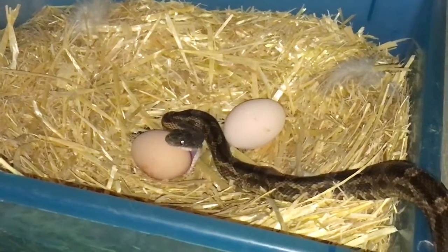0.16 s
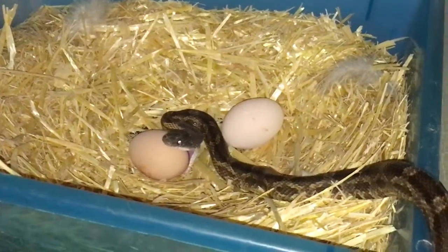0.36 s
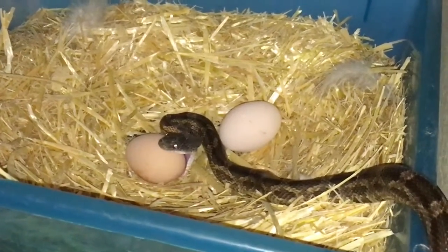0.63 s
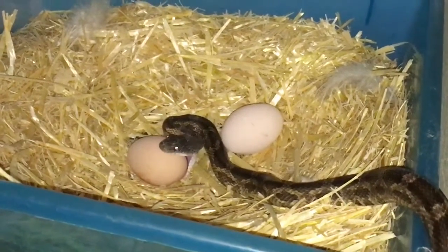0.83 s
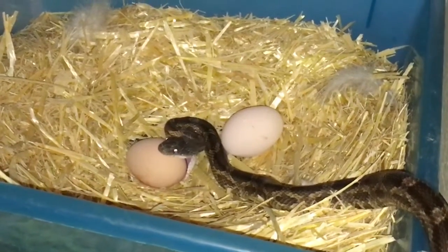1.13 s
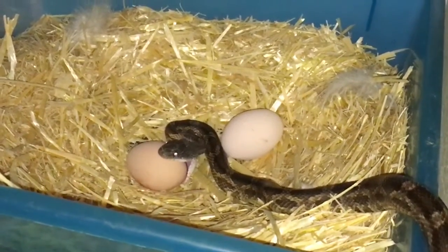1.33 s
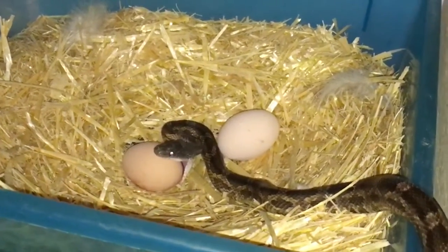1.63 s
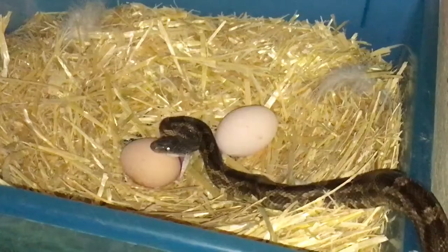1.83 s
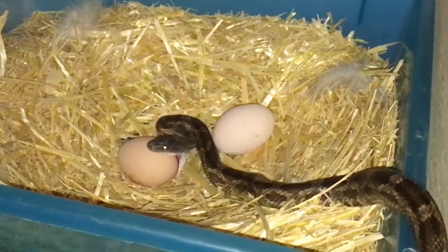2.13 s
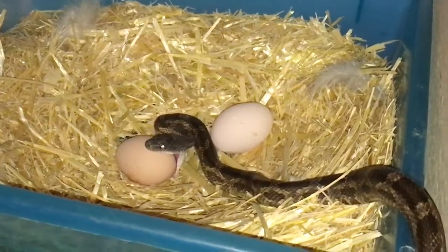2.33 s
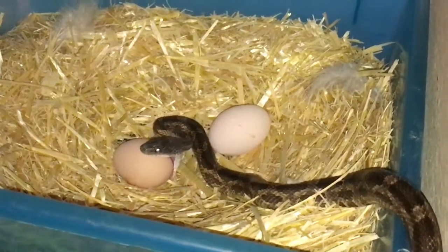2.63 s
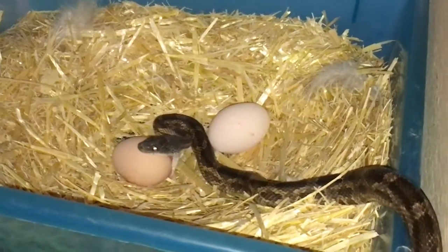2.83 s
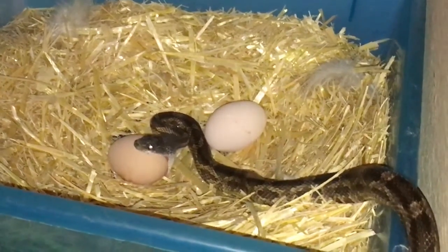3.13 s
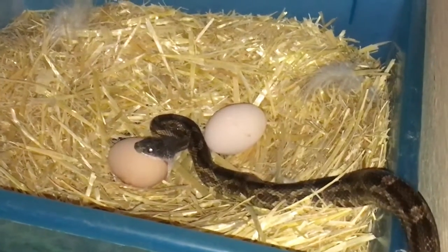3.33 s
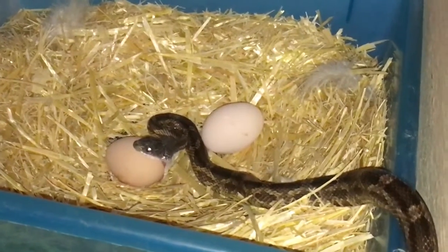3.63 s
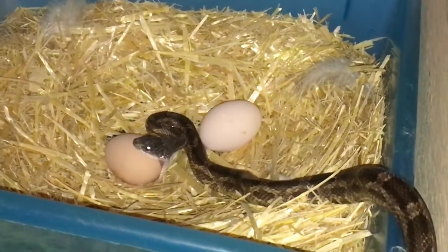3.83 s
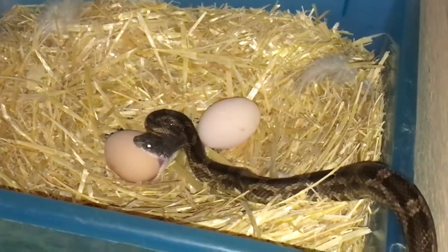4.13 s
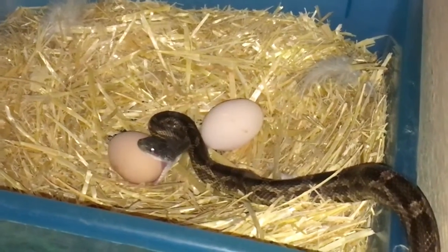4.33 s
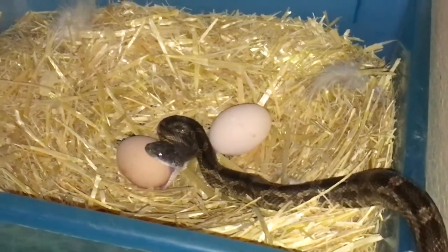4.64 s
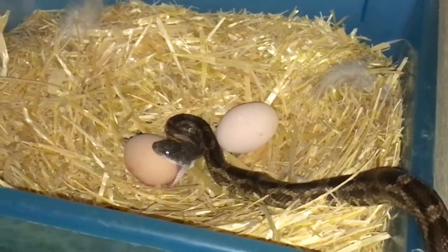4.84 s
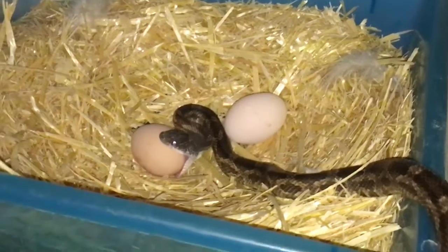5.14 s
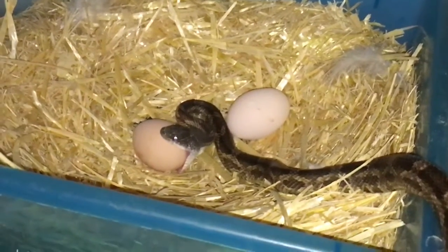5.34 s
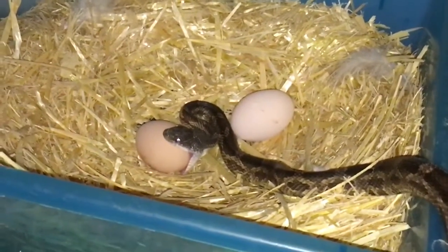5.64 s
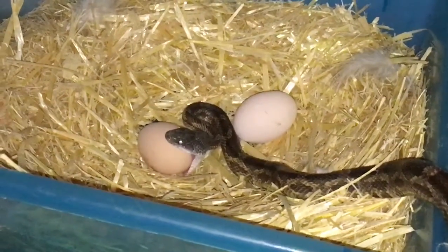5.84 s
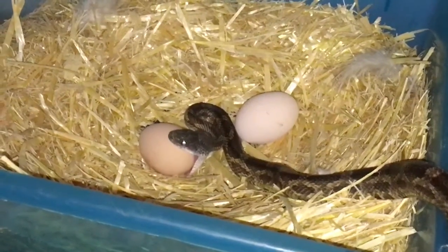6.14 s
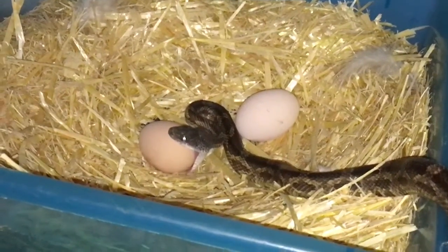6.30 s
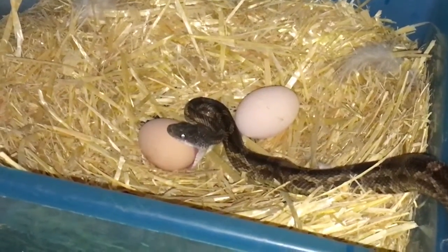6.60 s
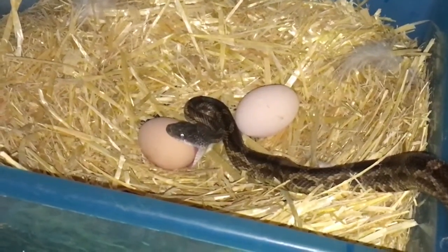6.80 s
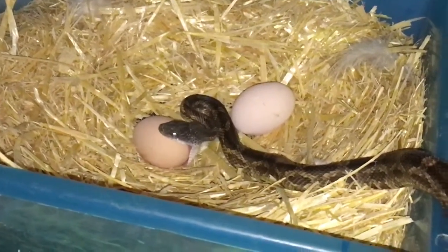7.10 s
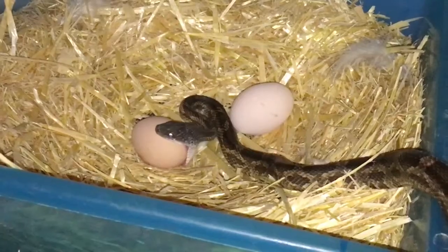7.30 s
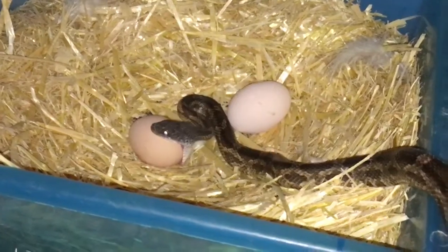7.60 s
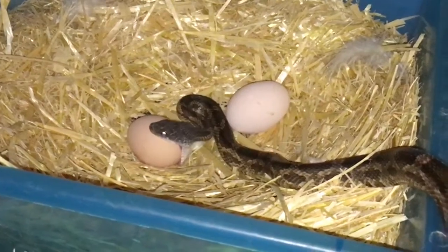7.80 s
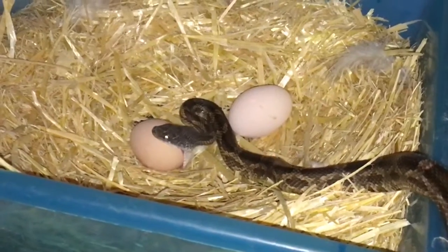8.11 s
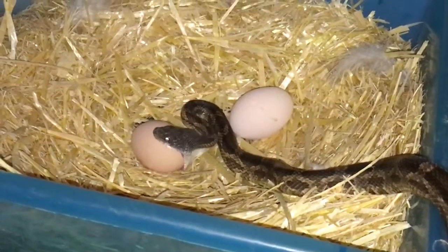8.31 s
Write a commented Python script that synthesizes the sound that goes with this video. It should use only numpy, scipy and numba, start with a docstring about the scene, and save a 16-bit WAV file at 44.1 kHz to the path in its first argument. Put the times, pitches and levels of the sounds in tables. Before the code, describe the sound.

A hen opens with a long, rasping growl close by in a small coop, swelling to a squeezed end at about 0.9 seconds. A sharp cluck at 1.1 seconds leads straight into a second, slightly higher growl that lasts until 2 seconds. These are the loudest sounds and have a short, boxy echo. Dry straw stirs faintly beneath them, then rustles softly with small snaps from 2 to 4.7 seconds. A few quiet clucks fall between 3 and 4 seconds. At 5 seconds the hen gives one short, clear moan on a level pitch. From about 5.5 seconds a very faint, distant songbird repeats a short phrase, and another bird gives four rising peeps between 7.4 and 8.1 seconds. The straw rustles and ticks again around 8 seconds. A faint, low motor hum and light hiss continue throughout.

```python
"""Inside a small wooden coop, a hen gives two long, rasping growls, a few short clucks and one clear moan.
Her voice is a source and a filter: pulses from the syrinx excite the resonances of throat and bill,
irregular pulses giving a rasp and regular ones a tone. Each growl swells and ends in a squeeze.
Straw rustles and ticks by stick-slip friction, and the boards add a short echo. Far off, one small bird
repeats a phrase and another peeps, over the low, beating hum of motors."""
import sys
import numpy as np
from scipy import signal
from scipy.fft import rfft, irfft
from scipy.io import wavfile
from scipy.ndimage import uniform_filter1d
from numba import njit

SR = 44100
rng = np.random.default_rng(int(sys.argv[2]) if len(sys.argv) > 2 else 0)


def dump(signal):
    """Clip the signal to [-1, 1] and save it as 16-bit WAV at the path in sys.argv[1]."""
    limited = np.clip(np.atleast_2d(signal).T, -1, 1)
    pcm = np.round(limited * 32767).astype(np.int16)
    wavfile.write(sys.argv[1], SR, pcm)


N = 373086
TIME = np.arange(N) / SR


def undb(db):
    """Amplitude ratio of a level in decibels."""
    return 10 ** (np.asarray(db) / 20)


def unit(x):
    """Normalisation to rms 1."""
    return x / np.sqrt(np.mean(x ** 2) + 1e-18)


def steady(x, span_s):
    """Normalisation of the running rms to 1."""
    return x / np.sqrt(np.abs(uniform_filter1d(x ** 2, int(span_s * SR))) + 1e-12)


def curves(rows):
    """Linear interpolation of each column over the times in the first."""
    times, *columns = np.transpose(rows)
    return [np.interp(TIME, times, column) for column in columns]


def gate(start, end, rise_s, fall_s):
    """Trapezoidal envelope from start to end."""
    return np.clip((TIME - start) / rise_s, 0, 1) * np.clip((end - TIME) / fall_s, 0, 1)


def walk(rate_hz):
    """Smooth random modulation with a standard deviation near 1."""
    hold = int(SR / rate_hz)
    steps = np.repeat(rng.standard_normal(N // hold + 1), hold)
    return 1.3 * uniform_filter1d(uniform_filter1d(steps, hold), hold)[:N]


def colour(x, points, size=4096):
    """Minimum-phase filter through points (f/Hz, gain/dB), made by folding the cepstrum."""
    hz, db = np.transpose(points)
    grid = np.maximum(np.fft.rfftfreq(size, 1 / SR), 1)
    cepstrum = irfft(np.log(undb(np.interp(np.log(grid), np.log(hz), db))))
    cepstrum[1:size // 2] *= 2
    cepstrum[size // 2 + 1:] = 0
    return signal.oaconvolve(x, irfft(np.exp(rfft(cepstrum))))[:N]


def lift(x, edges_hz, db):
    """Zero-phase boost or cut of one band."""
    band = signal.sosfiltfilt(signal.butter(2, edges_hz, "bandpass", fs=SR, output="sos"), x)
    return x + (undb(db) - 1) * band


@njit
def resonance(x, hz, width_hz):
    """Second-order resonator with unit gain at its moving centre frequency."""
    y, band_state, low_state = np.empty(len(x)), 0., 0.
    for i in range(len(x)):
        g, damping = np.tan(np.pi * hz[i] / SR), width_hz / hz[i]
        band = (band_state + g * (x[i] - low_state)) / (1 + g * (g + damping))
        band_state, low_state = 2 * band - band_state, low_state + 2 * g * band
        y[i] = damping * band
    return y


def cascade(x, hz, width_hz):
    """Two equal resonators in series, for steeper skirts."""
    return resonance(resonance(x, hz, width_hz), hz, width_hz)


# motor tones: f/Hz, level/dB
MOTOR_TONES = [(60.0, -61), (61.7, -64.5), (72.0, -57.5), (242.5, -76.5)]
def background():
    """Beating: motor tones close in frequency interfere, over a narrow-band drone, rumble and hiss."""
    hum = 0
    for hz, db in MOTOR_TONES:
        amplitude = np.sqrt(2) * undb(db + .4 * walk(3.2))
        hum += amplitude * np.sin(2 * np.pi * (hz * TIME + rng.random()) + .098 * walk(4.3))
    drone = unit(cascade(rng.standard_normal(N), np.full(N, 74.75), width_hz=4.3))
    rumble_spectrum = [(15, -22), (36, -10), (85, -5.5), (120, -10), (250, -40), (800, -63)]
    rumble = unit(colour(rng.standard_normal(N), rumble_spectrum))
    hiss_spectrum = [(88, -33.5), (150, -1.5), (240, -3), (270, -7.5), (354, -5), (475, -14),
                     (624, -13), (1500, -19.5), (2270, -19), (3840, -24), (9080, -31), (16000, -35.5)]
    hiss = undb(-65.5 + .5 * walk(15)) * unit(colour(rng.standard_normal(N), hiss_spectrum))
    return hum + undb(-64) * (drone + rumble) + hiss


# notes of the songbird's phrase: t/s within it, duration/s, start f/Hz, end f/Hz, level/dB before gain
PHRASE_NOTES = [(0, 0.149, 2550, 2410, -77), (0.038, 0.09, 3270, 2930, -80),
                (0.129, .16, 2268, 2204, -75.5), (.255, .1, 3230, 3400, -79),
                (0.34, 0.072, 2260, 2484, -78)]
# repeats of the phrase: t/s, gain/dB
PHRASE_REPEATS = [(5.42, -13), (5.6, -7), (6.034, -4.5), (6.466, -3.5), (6.92, -3.5)]
# another bird's rising peeps: t/s, level/dB
PEEPS = [(7.409, -73), (7.639, -70.5), (7.9, -77), (8.092, -73.5)]
def birds():
    """Propagation outdoors: gliding pure tones flutter with distance and trail a diffuse echo."""
    peep_s, peep_from_hz, peep_to_hz = .085, 2380, 2750
    notes = [(t + lag, length, from_hz, to_hz, db + gain_db)
             for t, gain_db in PHRASE_REPEATS for lag, length, from_hz, to_hz, db in PHRASE_NOTES]
    notes += [(t, peep_s, peep_from_hz, peep_to_hz, db) for t, db in PEEPS]
    song = np.zeros(N)
    waver, flutter = 1 + .008 * walk(130), undb(5.2 * walk(55))
    for t, length, from_hz, to_hz, db in notes:
        span = (TIME >= t) & (TIME < t + length)
        progress = (TIME[span] - t) / length
        hz = to_hz + (from_hz - to_hz) * np.abs(1 - progress) ** 1.94  # glides fast, then levels off
        phase = 2 * np.pi * np.cumsum(hz * waver[span]) / SR
        song[span] += undb(db) * np.sqrt(2 * np.abs(np.sin(np.pi * progress))) * np.sin(phase)
    trail = rng.standard_normal(SR // 2) * np.exp(-TIME[:SR // 2] / .038)
    return song * flutter + 1.15 * signal.oaconvolve(song, trail / np.linalg.norm(trail))[:N]


# spectrum of the straw: f/Hz, gain/dB
STRAW_SPECTRUM = [(290, -41), (500, 5), (1280, 6), (2570, 8.5), (2930, 4.5), (4800, 6), (8960, 0.5),
                  (10500, 1.5), (14500, -1), (16000, -12)]
# shifts of the straw: peak t/s, rise constant/s, decay constant/s, level/dB
RUSTLES = [(.426, 0.018, 0.033, -55.5), (.73, .015, 0.28, -61), (2.033, 0.0069, 0.078, -57.5),
           (2.509, 0.0054, 0.28, -62), (2.646, 0.036, 0.018, -54), (3.326, 0.041, 0.024, -64),
           (3.632, 0.015, 0.048, -59.5), (3.959, 0.065, 0.082, -55.5), (4.26, 0.0034, 0.14, -59),
           (4.644, 0.0041, 0.019, -56.5), (7.76, 0.079, 0.1, -64.5), (7.912, 0.047, 0.045, -57),
           (7.99, 0.017, 0.15, -59.5)]
# snapping stalks: t/s, peak level/dB before filtering, ring f/Hz
SNAPS = [(2.4646, -54, 1300), (2.508, -45, 8900), (2.5484, -39.5, 9000), (2.645, -45, 3440),
         (2.731, -50, 750), (2.981, -54, 4460), (3.4915, -43, 9240), (3.7826, -49.5, 7390),
         (4.024, -49, 3010), (4.0354, -39, 4540), (4.1065, -48.5, 2700), (4.228, -48.5, 10930),
         (4.257, -45, 8950), (4.3828, -48.5, 5700), (4.479, -48.5, 5750), (6.8038, -52.5, 6600),
         (7.212, -57, 4800), (7.237, -55.5, 1350), (7.262, -59, 2600), (7.988, -45, 5470),
         (8.0664, -46, 5290), (8.098, -46.5, 9100), (8.189, -45.5, 9000)]
def straw():
    """Stick-slip friction: dense tiny slips merge into a rustle; a snapping stalk rings briefly."""
    slips_per_s, settling_per_s = 2600, 45
    slips = (rng.random(N) < slips_per_s / SR) * rng.standard_normal(N)
    slips *= undb(1.6 * np.minimum(rng.exponential(size=N), 4))
    crackle = steady(colour(unit(slips) + .64 * rng.standard_normal(N), STRAW_SPECTRUM), .044)
    envelope, snaps = np.zeros((2, N))
    for t, rise, fall, db in RUSTLES:
        from_peak = np.maximum((t - TIME) / rise, (TIME - t) / fall)
        envelope = np.maximum(envelope, undb(db) * np.exp(-np.minimum(from_peak, 20)))
    age = TIME[:SR // 20]
    for t, db, ring_hz in SNAPS:
        burst = rng.standard_normal(len(age)) * (np.exp(-age / .0016) + .18 * np.exp(-age / .01))
        burst += 2.3 * resonance(burst, np.full(len(age), ring_hz), width_hz=1100)
        onset = int(t * SR)
        snaps[onset:onset + len(age)] += undb(db) * burst / np.abs(burst).max()
    settling = (rng.random(N) < settling_per_s / SR) * rng.standard_normal(N) * undb(-52)
    return crackle * envelope + colour(snaps + settling, STRAW_SPECTRUM)


def coop_echo(x, t60_s=.14, low_t60_s=.37):
    """Reverberation: close boards reflect densely; straw absorbs the treble, so the lows last longer."""
    age = TIME[:SR // 2]
    broad, low = rng.standard_normal((2, len(age)))
    low = signal.sosfilt(signal.butter(2, 600, fs=SR, output="sos"), low)
    echo = (broad * undb(-60 * age / t60_s) + .5 * low * undb(-60 * age / low_t60_s)) * (age > .003)
    echo = signal.sosfilt(signal.butter(1, 4500, fs=SR, output="sos"), echo / np.linalg.norm(echo))
    return signal.oaconvolve(x, echo)[:N]


# air modes between the boards: f/Hz, bandwidth/Hz, gain/dB
AIR_MODES = [(501, 24, 4.5), (574, 40, 3.5), (692, 9, 5.5), (824, 18, 2), (896, 19, -2), (1018, 18, -2),
             (1130, 50, -6.5), (1214, 16, -5.5), (1326, 33, -5), (1430, 26, -12), (1612, 36, -1),
             (1846, 43, 0.5)]
def coop_modes(x):
    """Standing waves: narrow air modes colour sound from deep in the coop, at unchanged power."""
    rings = sum(undb(db) * signal.lfilter(*signal.iirpeak(hz, hz / width, fs=SR), x)
                for hz, width, db in AIR_MODES)
    return unit(x + rings) * np.std(x)


def syrinx(hz, rough, limp, jitter, scatter_db, air_db):
    """Pulse source: roughness scatters the pulses; limp weakens and hastens alternate ones (period 2)."""
    phase = np.cumsum(hz) / SR
    cycles = np.arange(1, int(phase[-1]))
    onsets = np.interp(cycles, phase, np.arange(N))
    shift, strength, slip = rng.standard_normal((len(cycles), 3)).T
    rough, period = rough[onsets.astype(int)], SR / hz[onsets.astype(int)]
    weak = np.cumsum(np.where(slip * rough > 1, 2, 1)) % 2  # the strong-weak order sometimes slips
    onsets += (jitter * shift - .15 * limp * weak) * rough * period
    push = undb(scatter_db * rough * strength - 12 * limp * (1 - rough) * weak)
    taps = onsets.astype(int)[:, None] + np.arange(-7, 9)
    offset = taps - onsets[:, None]
    shapes = push[:, None] * np.sinc(offset) * np.sinc(offset / 8)  # band-limited impulses
    pulses = np.bincount(np.clip(taps, 0, N - 1).ravel(), shapes.ravel(), N)
    # a puff of turbulent air follows each opening
    puffs = signal.lfilter([1], [1, -np.exp(-1 / (.006 * SR))], pulses) * rng.standard_normal(N)
    return unit(pulses) + undb(air_db) * unit(puffs)


# spectral envelope of a cluck: f/Hz, gain/dB
CLUCK_SPECTRUM = [(40, -63), (200, 7.5), (390, 1), (800, 4), (1200, 5), (1600, 3.5), (2000, -3),
                  (2400, -15), (3500, -16), (4400, -7.5), (5200, -21), (6000, -13.5), (9500, -24),
                  (15000, -37)]
# clucks: t/s, duration/s, top f/Hz, level/dB, roughness (0-1), added fundamental/dB,
# open-bill brightness/dB, throat f/Hz
CLUCKS = [(1.097, 0.041, 394, -32.5, 0.34, -19, 3.5, 1590),
          (3.095, 0.087, 248.3, -66.5, 0.4, -1.5, 1, 1020), (3.849, .06, 244.3, -55, 0.48, -5.5, 2, 1410),
          (4.013, 0.035, 333.7, -50, 0.22, -5, -11, 1050)]
def clucks():
    """Transient excitation: pitch and level arch with each short push of air, which rings the throat."""
    hz, throat_hz = np.full(N, 300.), np.full(N, 1000.)
    rough, envelope, body, bright_db = np.zeros((4, N))
    for t, length, pitch, db, roughness, body_db, open_db, ring_hz in CLUCKS:
        span = (TIME >= t) & (TIME < t + length)
        progress = (TIME[span] - t) / length
        hz[span] = pitch * (1 - .19 * (progress - .6) ** 2)
        rough[span], body[span] = roughness, undb(body_db)
        bright_db[span], throat_hz[span] = open_db, ring_hz
        envelope[span] = undb(db) * np.abs(np.sin(np.pi * progress ** .92)) ** 1.4
    pulses = syrinx(hz, rough, limp=0, jitter=.047, scatter_db=12.5, air_db=-13)
    voice = colour(pulses, CLUCK_SPECTRUM)
    voice += undb(.5) * resonance(voice, throat_hz, width_hz=75)
    voice = lift(voice, [1400, 2600], bright_db)
    fundamental = steady(cascade(voice, hz, width_hz=160), .017)
    return (steady(voice, .0188) + body * fundamental) * envelope


# spectral envelope with the bill nearly shut: f/Hz, gain/dB
MOAN_SPECTRUM = [(60, -36), (200, -7), (277, -1), (553, -1.5), (830, 0), (1110, -10), (1390, -3),
                 (1660, -9.5), (1940, -15), (2220, -25), (2500, -26.5), (3100, -35.5), (3680, -35.5),
                 (4450, -31.5), (5000, -38), (5500, -33), (6480, -64), (8300, -47), (10100, -42),
                 (12000, -72)]
# course of the moan: t/s, fundamental f/Hz, level/dB
MOAN_CONTOUR = [(4.955, 270.8, -35.5), (4.969, 266.6, -39.5), (4.994, 281, -38), (5.035, 276.5, -38.5),
                (5.07, 279, -38), (5.095, 271, -39), (5.129, 276, -39.3), (5.165, 281.6, -39.5),
                (5.217, 275.2, -38.5), (5.236, 268, -44.5)]
def moan():
    """Periodic vibration: even pulses give a clear harmonic note that catches only at its two ends."""
    hz, db = curves(MOAN_CONTOUR)
    start, end = MOAN_CONTOUR[0][0] - .012, MOAN_CONTOUR[-1][0] + .0036
    rough = .03 + .45 * np.exp(-np.abs(TIME - start) / .014) + .3 * np.exp(-np.abs(TIME - end) / .012)
    pulses = syrinx(hz * (1 + .004 * walk(60)), rough, limp=0, jitter=.11, scatter_db=6, air_db=-28)
    note = colour(pulses, MOAN_SPECTRUM)
    note += undb(14.5) * resonance(note, np.full(N, 3710.), width_hz=92)
    for edges_hz in [1000, 1250], [1250, 2100], [2100, 6000]:  # the upper harmonics flutter
        note = lift(note, edges_hz, 1.5 * walk(35))
    return steady(note, .03) * undb(db) * gate(start, end, rise_s=.011, fall_s=.0062)


# resonances of the bill: ratio to the beak frequency, bandwidth/Hz, relative gain/dB
BILL_MODES = [(0.603, 610, -2), (.74, 600, -2), (0.997, 540, 9.5), (1.27, 800, 2.5), (1.62, 890, 1)]
def bill(voice, beak_hz):
    """Radiation from an opening: a wider bill resonates higher and lets more of its ring out."""
    rings = sum(undb(db) * cascade(voice, ratio * beak_hz, width) for ratio, width, db in BILL_MODES)
    return rings * (beak_hz / 6900) ** 3


# spectral envelope of a growl: f/Hz, gain/dB
GROWL_SPECTRUM = [(40, -32), (150, -3.5), (215, -1.5), (310, -16.5), (410, -13), (520, -11), (640, -13),
                  (850, -11), (1100, -6.5), (1550, -12), (1750, -17), (2050, -17.5), (2700, -24.5),
                  (3200, -19.5), (3900, -18.5), (4500, -19), (4900, -28.5), (8000, -39.5), (15000, -46)]
# bill movement, a list per growl: t/s, beak f/Hz, brightness/dB, rasp offset/dB
BILL_CONTOURS = [
    [(0, 5470, -1, -3.5), (.125, 5680, 2, -4), (.16, 6800, -3.5, -1.5), (.28, 6400, -1, 2),
     (.5, 6850, 0, -1.5), (.68, 6907, 5.5, 1.5), (.76, 6650, -3, 0), (.83, 5900, 2, 0.5),
     (.9, 6520, -1.5, -0.5)],
    [(1.17, 6910, -0.5, 0.5), (1.55, 7060, 1, 0.5), (1.75, 7400, 3, -1), (1.87, 7000, 0, 2.5),
     (1.95, 6360, 1, 0), (2.01, 6646, -4, 0)],
]
# a list per growl: t/s, fundamental f/Hz, level/dB, roughness (0-1), throat f/Hz, mouth f/Hz, upper f/Hz
GROWL_CONTOURS = [
    [(-.04, 309, -43, 0.51, 1100, 1450, 2220), (.1, 312.7, -41, .6, 1140, 1490, 2160),
     (.27, 322.2, -39.5, .5, 1150, 1420, 2300), (.57, 331, -37.5, 0.55, 1114, 1470, 2300),
     (.635, 329.2, -35.3, .6, 1100, 1500, 2270), (.675, 320.1, -36.5, .5, 1150, 1520, 2180),
     (.76, 298.9, -39.5, 0.46, 1210, 1380, 2030), (.81, 299.4, -36, 0.42, 1220, 1240, 1960),
     (.88, 300.6, -34, 0.31, 1230, 1230, 1970), (.918, 305, -37, 0.19, 1225, 1304, 2080)],
    [(1.135, 315.2, -47, 0.54, 1170, 1400, 1950), (1.18, 316, -38.5, 0.46, 1170, 1420, 1970),
     (1.25, 322.2, -39.2, .42, 1190, 1430, 2000), (1.33, 324.9, -37, .55, 1180, 1370, 2020),
     (1.57, 335.2, -36, 0.61, 1210, 1420, 2030), (1.625, 340.3, -34.6, 0.58, 1190, 1370, 2070),
     (1.68, 337.8, -36, .6, 1230, 1510, 2050), (1.79, 335.2, -35, .6, 1230, 1550, 2060),
     (1.87, 332, -37, 0.54, 1220, 1490, 2070), (1.925, 331, -34, 0.23, 1260, 1440, 2060),
     (1.98, 332.2, -33, 0.24, 1290, 1390, 2030), (2.022, 331.4, -34, .3, 1260, 1410, 2080)],
]
def growls():
    """Period doubling: uneven pulses excite the formants, then settle into a strong-weak beat."""
    out = 0
    for contour, moves in zip(GROWL_CONTOURS, BILL_CONTOURS):
        start, end = contour[0][0], contour[-1][0]
        hz, db, rough, throat_hz, mouth_hz, upper_hz = curves(contour)
        beak_hz, bright_db, rasp_db = curves(moves)
        beak_hz *= 1 + .014 * walk(70)  # the bill trembles
        hz *= 1 + .045 * rough * walk(30)
        pulses = syrinx(hz, rough, limp=.9, jitter=.11, scatter_db=5, air_db=-7)
        voice = colour(pulses, GROWL_SPECTRUM)
        # the small bill radiates the lowest tones poorly
        voice = signal.sosfilt(signal.butter(2, 340, "highpass", fs=SR, output="sos"), voice)
        windpipe_hz = 3185
        formants = [(throat_hz, 100, 4), (mouth_hz, 177, 4), (upper_hz, 89, 4), (windpipe_hz, 91, 0)]
        rings = sum(undb(gain_db) * resonance(voice, centre_hz * (1 + .018 * walk(20)), width_hz)
                    for centre_hz, width_hz, gain_db in formants)
        # in the closing squeeze the tight throat rings harder, with more rasp and less body
        squeeze = np.exp(-((TIME - end + .063) / .059) ** 2)
        voice += rings * undb(3.5 * squeeze) + bill(voice, beak_hz) * undb(3.5 * walk(90))
        voice = lift(voice, [1350, 2700], bright_db)
        voice = lift(voice, [2600, 4900], rasp_db - 4 + 6.5 * squeeze)
        voice = lift(voice, [240, 400], 3.5 - 2 * squeeze)
        effort = undb(db + 1.5 * walk(45))
        out += steady(voice, .0203) * effort * gate(start, end, rise_s=.037, fall_s=.033)
    return coop_modes(out)


def scene():
    """Direct-to-reverberant ratio: growls and clucks fill the coop; nearer straw and moan are drier."""
    far, near, closest = growls() + clucks(), straw(), moan()
    echo = coop_echo(far + undb(-7) * near + undb(-13) * closest)
    return (far + near + closest + echo + birds() + background())[None]


# response of the microphone: f/Hz, gain/dB
MIC_RESPONSE = [(4200, -0.5), (4800, -2.5), (5500, 1.5), (9700, 4), (10500, -0.5), (11600, 3.5)]
def record(dry):
    """Frequency response: the microphone has two shallow treble dips, and a low-pass cuts the top."""
    low_pass = signal.ellip(10, .2, 70, 16000, fs=SR, output="sos")
    return signal.sosfilt(low_pass, colour(dry[0], MIC_RESPONSE))[None]


dry = scene()
out = record(dry)
dump(out)
```